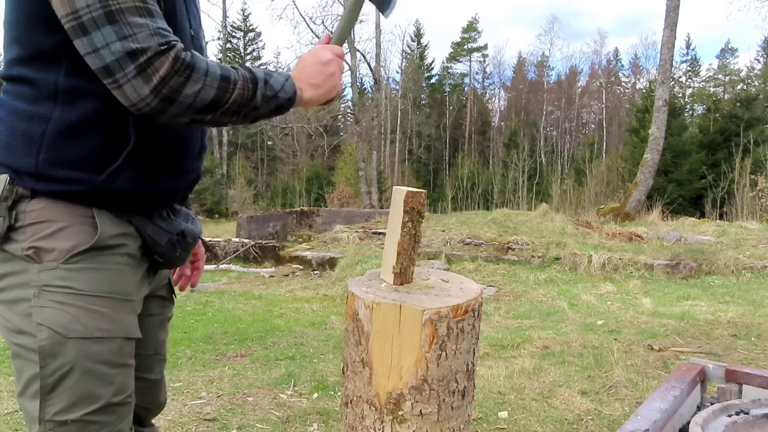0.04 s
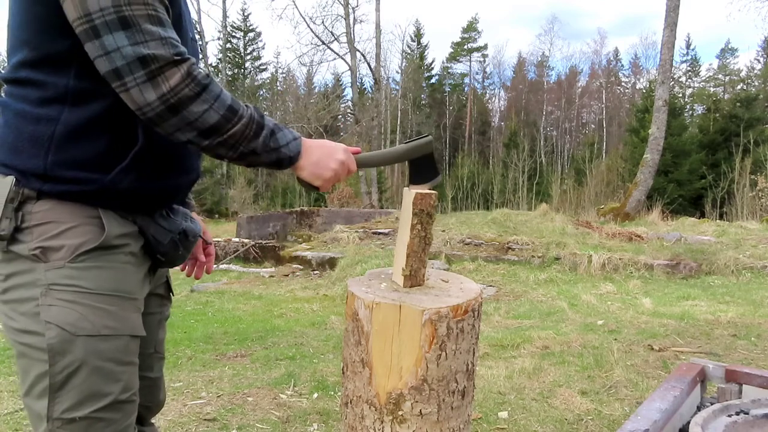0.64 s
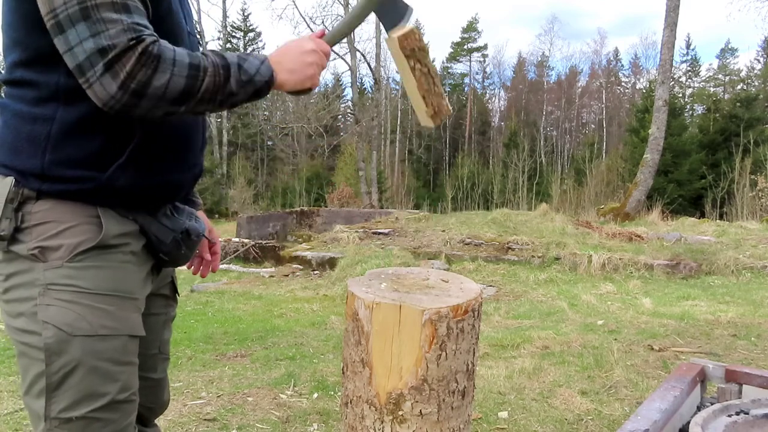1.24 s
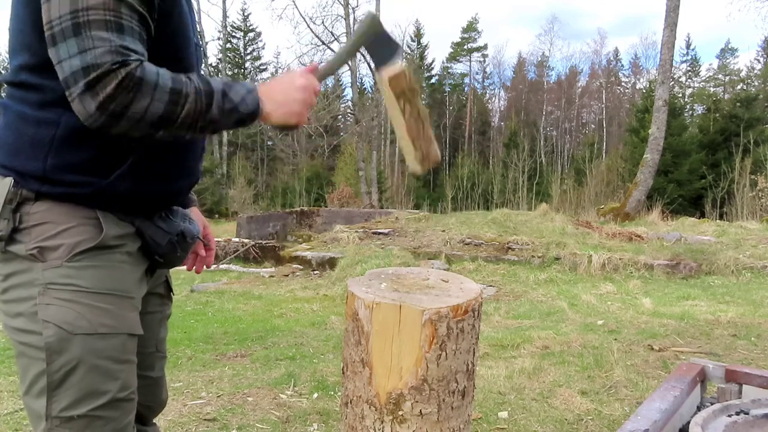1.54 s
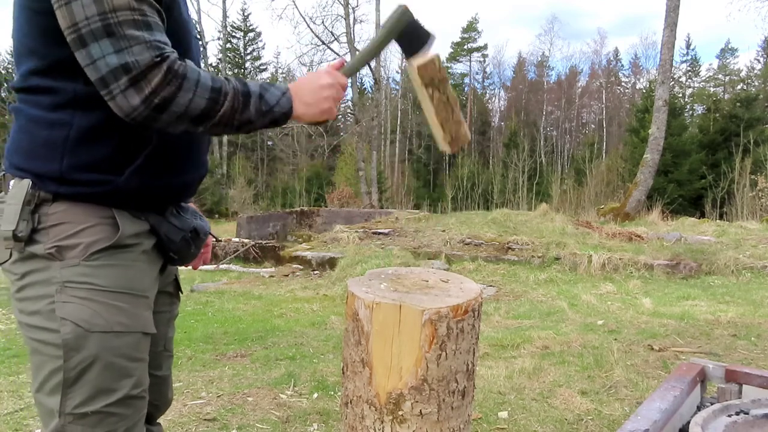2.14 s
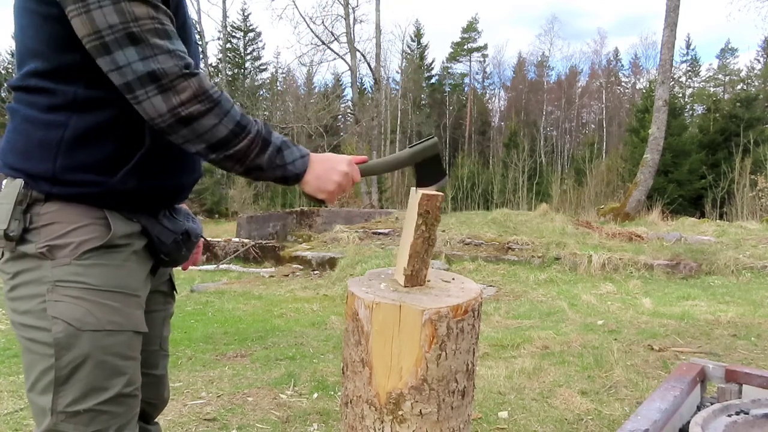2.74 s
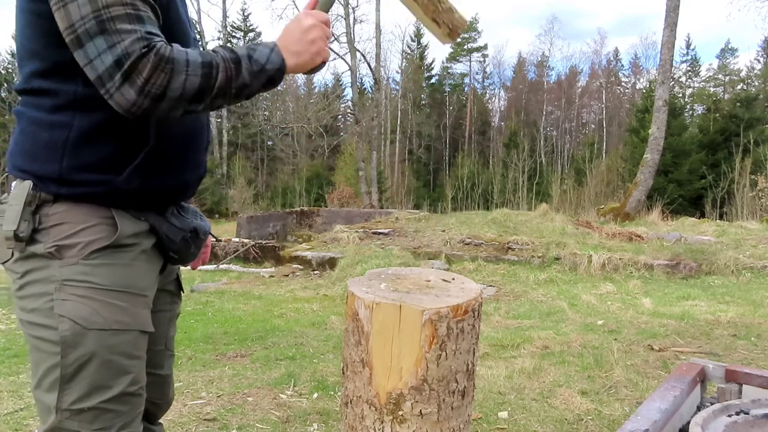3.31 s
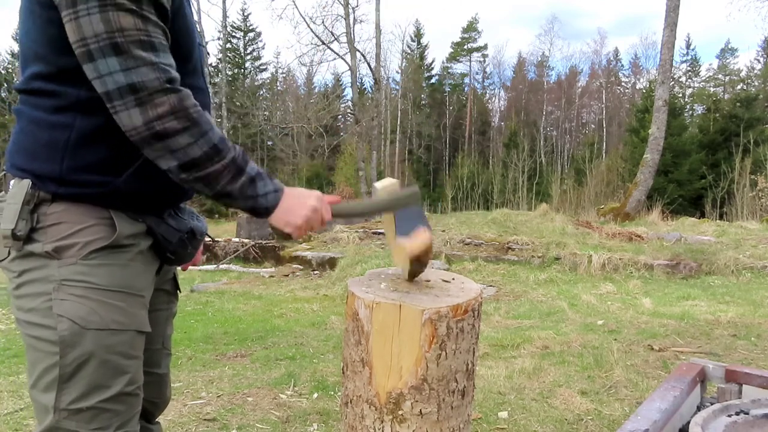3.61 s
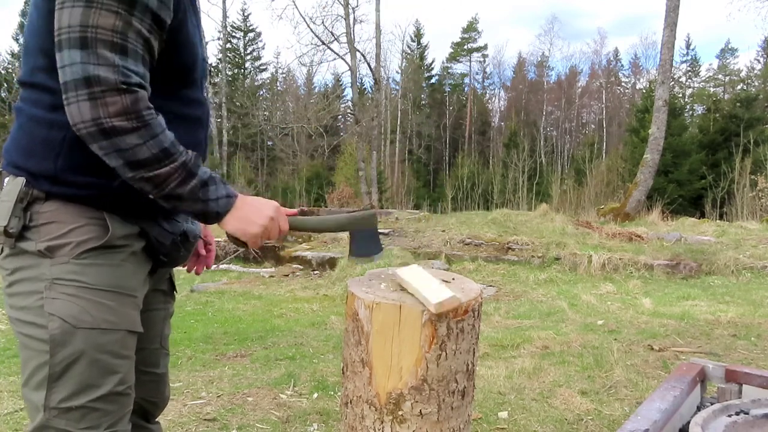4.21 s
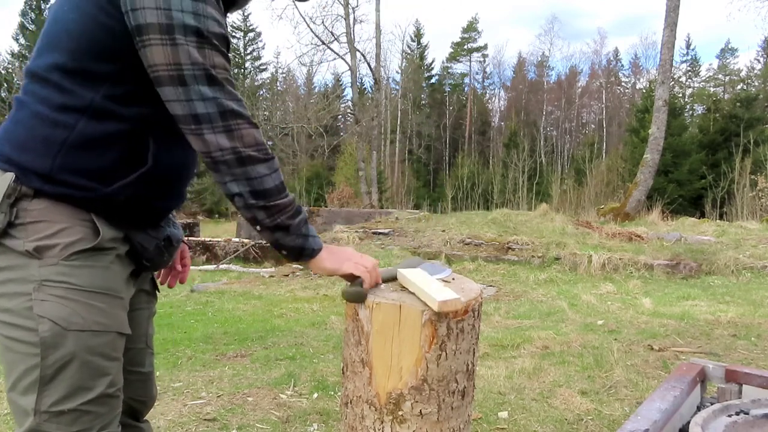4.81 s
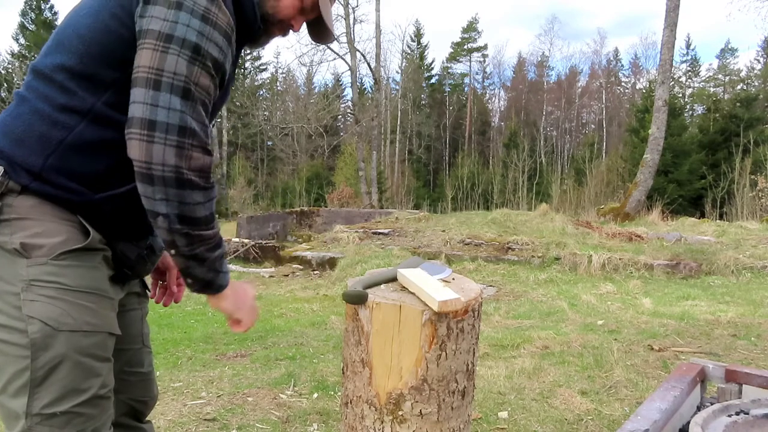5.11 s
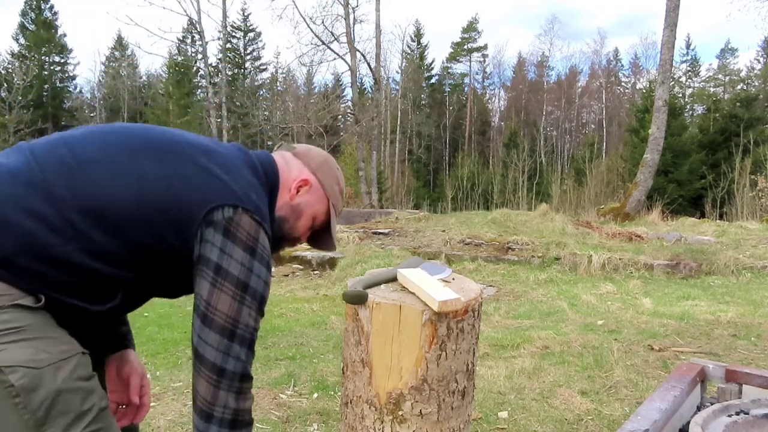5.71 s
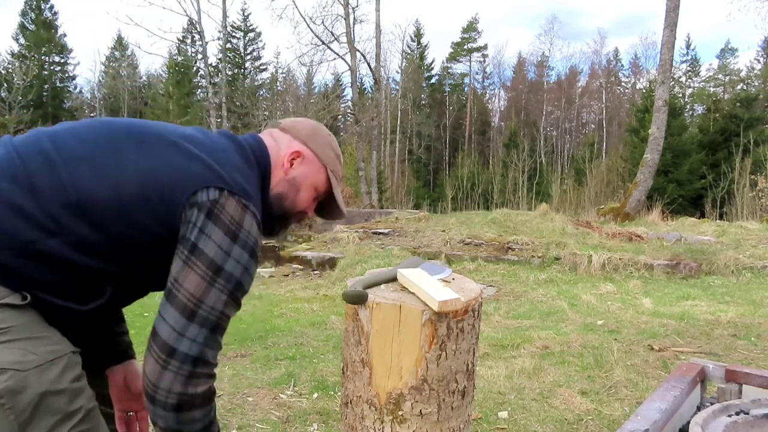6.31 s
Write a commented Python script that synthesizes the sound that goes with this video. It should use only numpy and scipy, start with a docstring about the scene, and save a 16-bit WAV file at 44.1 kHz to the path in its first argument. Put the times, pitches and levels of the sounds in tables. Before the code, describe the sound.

Close by, a hatchet bites into a stick on a chopping block, and both are slammed down three more times until the wood splits. Each sharp chop echoes faintly from distant trees. The halves clatter, the blade scrapes free, and one piece thuds onto grass. Lighter knocks follow as the hatchet is laid down, then clothes rustle and twigs snap softly. The stereo microphone catches low bumps of air.

```python
"""Splitting firewood at the forest edge

Close to the microphone a hatchet bites into a stick on a chopping block; both are slammed down until the
wood splits. The halves clatter, one drops on the turf, the blade is worked free and laid down, and the
chopper stoops, clothes rustling, twigs snapping underfoot. Farther off, the trees throw each chop back.
The near stereo microphone overloads and its stand hums with the jolt."""
import sys
import numpy as np
from scipy import signal
from scipy.fft import rfft, irfft
from scipy.io import wavfile

SR = 44100
rng = np.random.default_rng(int(sys.argv[2]) if len(sys.argv) > 2 else 0)


def wav_out(sig):
    """Save sig, one row per channel (or a flat mono array), as 16-bit PCM at SR to the path in sys.argv[1]."""
    wavfile.write(sys.argv[1], SR, np.round(np.clip(np.atleast_2d(sig).T, -1, 1) * 32767).astype(np.int16))


N = 288842
AGE = np.arange(SR // 2) / SR  # time since a blow, s
FREQS = np.fft.rfftfreq(N, 1 / SR)


# Hard blows, close by: t/s, block level/dB, block pitch factor, stick level/dB, stick pitch factor,
# bite f/Hz, bite level/dB, snap f/Hz, snap level/dB, crack level/dB, crack cutoff/Hz,
# echo band low/Hz, high/Hz, relative echo level/dB
HARD_BLOWS = [(0.3283, 0.993, 1.01, -9, 1.02, 1550, 14, 4630, -8.5, -3, 11700, 950, 1992, 0.5),
              (1.6731, 3.96, 1.053, -10.5, 0.99, 1634, 7, 4560, -3, -7.5, 11940, 950, 1979, -8),
              (2.6943, 3.96, 1.13, -10.5, 1.02, 1303, 7.5, 4330, -2, -2, 15600, 950, 2366, 2),
              (3.6628, 6, .92, -7.5, 0.96, 1980, 4, 2936, 0, -2, 7430, 2220, 3170, -2)]

def chops():
    """The hatchet's blows at the microphone, and the pulse each one sends towards the trees."""
    near, outward = np.zeros(N), np.zeros(N)
    click = signal.unit_impulse(len(AGE))
    wide_band = amp(-14) * unit(bandpass(click, 450, 3575))
    for s, *strike, low_hz, high_hz, echo_db in HARD_BLOWS:
        chop = blow(*strike, bite_t60=0.0094, snap_t60=0.01, crack_t60=0.0079, seat_s=0.00071, hold=1.54)
        add(near, s, chop)
        own_band = unit(bandpass(click, low_hz, high_hz))
        add(outward, s, amp(echo_db - 30.5) * (own_band + wide_band))
    return near, outward


# Modes of the stick and of the block under it: base f/Hz, relative level/dB, base t60/s
STICK_MODES = [(640, -19.5, .045), (944, -4, 0.076), (971, -9.5, 0.041), (1370.2, -15.5, 0.038),
               (1591.4, -13, 0.045), (1977.7, -10, 0.033), (2620.5, -22, 0.0247), (3160, -24.5, 0.029),
               (4120.3, -24.5, .02)]
BLOCK_MODES = [(205.4, -13.5, 0.03), (284.22, -11, 0.012), (481, -5, 0.023994), (785.4, 1.5, 0.012),
               (1121, -9.5, 0.016)]
# Spectrum of snapping fibres: f/Hz, relative level/dB
FIBRE_SPECTRUM = [(100, -23), (800, -2.5), (2200, 10.5), (4400, -0.5), (7500, -2), (12000, -6.5),
                  (16000, -14.5)]

def blow(block_db, block_pitch, stick_db, stick_pitch, bite_hz, bite_db, snap_hz, snap_db, crack_db,
         cutoff_hz, bite_t60, snap_t60, crack_t60, seat_s, tilt_db=0, ring=1, hold=1):
    """Contact gives two short tones and a crack; the stick rings, and the block answers as it seats."""
    pivot_hz = STICK_MODES[1][0]
    stick = sum(amp(db + tilt_db * np.log2(hz / pivot_hz)) * mode(hz * stick_pitch, t60 * ring, 0.0004)
                for hz, db, t60 in STICK_MODES)
    block = sum((-1) ** k * amp(db) * mode(hz * block_pitch, t60, rise_s=seat_s)
                for k, (hz, db, t60) in enumerate(BLOCK_MODES))
    bite = amp(bite_db) * mode(bite_hz, bite_t60, rise_s=0.00049)
    snap = amp(snap_db) * mode(snap_hz, snap_t60, rise_s=0.00055)
    # with hold above 1 the crack lasts while the blade goes in, then stops short
    envelope = amp(-60 * (AGE / crack_t60) ** hold) * onset(0.00027)
    fibres = noise(FIBRE_SPECTRUM, len(AGE)) * envelope
    crack = butter(fibres, "low", cutoff_hz, order=5)
    return amp(block_db) * block + amp(stick_db) * stick + bite + snap + amp(crack_db) * crack


# Light blows at the block: t/s, block level/dB, stick level/dB, stick pitch factor,
# stick tilt/(dB per octave), ring length factor, bite f/Hz, bite level/dB, crack level/dB
LIGHT_BLOWS = [(3.6798, -47, -31, 1.0, 4, 1, 1960, -16, -41.5),
               (3.7269, -14, -47, 1.2, 9, 1, 1902, -17, -31),
               (3.7315, -16.5, -9.5, 0.96, -4.5, 1, 1900, -43, -33),
               (3.8916, -19.5, -19, 1.0, -2, 0.61, 2200, -22.5, -37),
               (4.697, -27, -33.5, 1.03, -1.5, .6, 1520, -43, -39.5),
               (4.7580, -13, -13, 0.9907, -0.5, 0.79, 1610, -18, -23),
               (4.8033, -19.5, -24, 1.02, -6, 1, 1405, -37, -34),
               (4.9018, -13, -11, 0.9921, 7.5, 0.67, 3043, -18, -20),
               (4.9045, -32, -14.5, 0.9916, -1.5, 1, 1377, -12, -34),
               (4.931, -29, -32, 1.02, -3.5, 1, 2770, -44, -48)]

def knocks():
    """Halves and hatchet knock on the block: it rings a little higher, and the end grain clacks."""
    out = np.zeros(N)
    block_pitch, clack_hz = 1.12, 1097
    for s, block_db, stick_db, stick_pitch, tilt_db, ring, bite_hz, bite_db, crack_db in LIGHT_BLOWS:
        knock = blow(block_db, block_pitch, stick_db, stick_pitch, bite_hz, bite_db,
                     snap_hz=clack_hz, snap_db=block_db + 0.5, crack_db=crack_db, cutoff_hz=4200,
                     bite_t60=0.019, snap_t60=0.01, crack_t60=0.016, seat_s=0.0005,
                     tilt_db=tilt_db, ring=ring)
        add(out, s, knock)
    return out


# A split half lands end first, then flat, and settles: t/s, level/dB, pitch factor, ring length factor
LANDINGS = [(4.2382, 2, 1.14, 0.51), (4.2522, -1.5, 0.973, 0.88), (4.308, -30.5, 1.14, 1.6),
            (4.435, -32.5, 1.075, 1.44)]
# Modes of the thud on turf: base f/Hz, relative level/dB, base t60/s
TURF_MODES = [(605, -5, 0.015), (316, -4, 0.021), (231.91, -11, 0.055), (144, -3.5, 0.042)]

def thuds():
    """Wood drops on the turf, and the grass softens the landing."""
    out = np.zeros(N)
    for s, db, pitch, ring in LANDINGS:
        thud = sum(amp(mode_db) * push(hz * pitch, t60 * ring) for hz, mode_db, t60 in TURF_MODES)
        add(out, s, amp(db) * butter(thud, "low", 600, order=4))
    return out


# A splinter, then twigs underfoot: t/s, thump level/dB, ring f/Hz, ring level/dB, crack level/dB
BREAKS = [(3.8187, -30, 2010, -22, -17), (5.464, -26.5, 1190, -23, -43.5), (5.53, -30.5, 1262, -22, -46),
          (5.9037, -24, 1133, -36.5, -47), (6.033, -37.5, 1112, -37.5, -50)]

def snaps():
    """Thin wood breaks: a crack, a short ring with one overtone, and a thump below."""
    out = np.zeros(N)
    for s, thump_db, hz, ring_db, crack_db in BREAKS:
        snap = blow(block_db=thump_db, block_pitch=0.694, stick_db=thump_db - 17, stick_pitch=0.94,
                    bite_hz=hz, bite_db=ring_db, snap_hz=1.37 * hz, snap_db=ring_db + 1,
                    crack_db=crack_db, cutoff_hz=5900,
                    bite_t60=0.02, snap_t60=0.0078, crack_t60=0.029, seat_s=0.0007)
        add(out, s, snap)
    return out


# Faint echoes trailing the chops: t/s, level/dB, band low/Hz, high/Hz, t60/s
CHOP_AFTERSOUNDS = [(1.680, -53.5, 3950, 5300, 0.37), (2.703, -41, 1000, 2680, 0.18),
                    (3.672, -45.5, 2500, 3418, 0.54)]

def aftersounds():
    """A grainy band of echo dies away after a chop."""
    out = np.zeros(N)
    for s, db, low_hz, high_hz, t60 in CHOP_AFTERSOUNDS:
        band = unit(bandpass(grains(len(AGE)), low_hz, high_hz))
        add(out, s, amp(db) * band * decay(t60) * onset(0.0027))
    return out


# Small bright ticks: t/s, level/dB
BRIGHT_TICKS = [(0.882, -53), (1.751, -47.5), (1.955, -50), (2.166, -49), (2.7854, -44.5), (2.909, -50.5),
                (2.9647, -50), (3.729, -38), (3.754, -41), (3.787, -49), (3.858, -42), (4.088, -41),
                (4.2244, -41), (4.2372, -29), (4.253, -39), (4.4282, -45), (4.698, -39), (4.758, -43),
                (5.5028, -39.5)]
# Their spectrum: f/Hz, relative level/dB
TICK_SPECTRUM = [(300, -8), (1500, 13.5), (3500, -0.5), (9000, -0.5), (16000, -26.5)]

def ticks():
    """Short grainy ticks, alone or as the bright edge of knocks and echoes."""
    out = np.zeros(N)
    for s, db in BRIGHT_TICKS:
        tick = unit(colour(grains(len(AGE)), TICK_SPECTRUM))
        add(out, s, amp(db) * tick * decay(0.034) * onset(0.00033))
    return out


# Slips of the blade: peak t/s, relative level/dB, 60 dB rise and fall/s (sign ignored)
BLADE_SLIPS = [(3.728, -44, 0.25), (3.823, -40, -0.07), (3.85, -58, 0.4), (4.085, -44.5, 0.08),
               (4.234, -44.5, 0.12), (4.345, -54, 0.36), (4.52, -55.5, 0.25)]
# Spectrum of steel scraping in the cleft: f/Hz, relative level/dB
SCRAPE_SPECTRUM = [(1000, -18), (2500, 1), (5000, 1), (9000, -2), (14000, -5.5), (16000, -5.5)]

def prying(grains_per_s=5000):
    """The blade slips in the cleft with a fine, clumped crackle."""
    catches = grains(N) * (rng.random(N) < grains_per_s / SR)
    pressure = sum(swell(s, db, length, length) for s, db, length in BLADE_SLIPS)
    scrape = colour(catches, SCRAPE_SPECTRUM) * flicker(depth_db=3, rate_hz=54)
    return amp(-4.5) * pressure * unit(scrape)


# Jolts to the microphone stand: t/s, level/dB, f/Hz, rebound delay/s, rebound level/dB, t60/s
STAND_JOLTS = [(.331, -29.5, 82.43, 0.067, -28.5, 0.42), (1.675, -25.5, 77.6, 0.0446, -18.5, 0.217),
               (2.697, -27.5, 78.8, 0.091, -29.5, 0.34), (3.664, -27, 81.9, .101, -30, 0.37),
               (4.256, -19.5, 73, 0.08664, -52, 0.3)]

def stand_hum():
    """Each heavy blow sets the stand humming, and again as it rocks back."""
    out = np.zeros(N)
    for s, db, hz, rebound_s, rebound_db, t60 in STAND_JOLTS:
        hum = mode(hz, t60, rise_s=0.008)
        add(out, s, amp(db) * hum)
        add(out, s + rebound_s, amp(rebound_db) * hum)
    return out


# Puffs right at the microphone: t/s, level/dB, f/Hz
AIR_PUFFS = [(3.6607, -15, 65.8), (4.556, -28, 38), (4.684, -25, 36), (4.714, -20, 42.13),
             (4.825, -20.5, 117), (4.921, -20, 55.4), (5.134, -24.5, 44)]

def puffs():
    """Single pushes of air strike the microphone as low bumps."""
    out = np.zeros(N)
    for s, db, hz in AIR_PUFFS:
        add(out, s, amp(db) * push(hz, t60=0.068))
    return out


# The chopper stoops nearby: peak t/s, rustle level/dB, swish level/dB, 60 dB rise/s, 60 dB fall/s
BODY_MOVES = [(5.49, -35.5, -58, 0.63, 0.25), (5.68, -54, -66, 0.69, 1), (5.91, -56.5, -62.5, 1.9, 0.684),
              (6.48, -58.5, -63, 1.555, 0.5324)]
# Spectra of coarse cloth and of the sleeve's fine fibres: f/Hz, relative level/dB
CLOTH_SPECTRUM = [(120, -32.5), (200, -4.5), (311, -5), (558, -0.5), (683, -2.5), (806, -5), (1870, -6.5),
                  (3830, -20.5), (9230, -27.5), (16000, -42.5)]
SLEEVE_SPECTRUM = [(2000, -13), (4000, -2), (8000, -1.5), (13000, -5.5), (16000, -9.5)]

def clothes():
    """Each movement rubs a coarse rustle and a fine swish out of the cloth."""
    rustle = sum(swell(s, db, rise, fall) for s, db, _, rise, fall in BODY_MOVES)
    swish = sum(swell(s, db, rise, fall) for s, _, db, rise, fall in BODY_MOVES)
    cloth = pair(CLOTH_SPECTRUM) * rustle * flicker(depth_db=2.07, rate_hz=125)
    sleeve = pair(SLEEVE_SPECTRUM) * swish * flicker(depth_db=1.2794, rate_hz=61)
    return cloth + sleeve


# Swirls round the microphone: peak t/s, level/dB, 60 dB rise and fall/s
AIR_SWIRLS = [(4.449, -46.5, 0.7), (4.699, -38.5, 0.6), (4.83, -34.5, 0.31), (4.91, -28.5, 0.37),
              (5.04, -42.5, .3), (5.23, -34, 0.05), (5.45, -39.5, 1.36), (5.92, -42, 0.37),
              (6.13, -50, 1.3)]
# Spectrum of their rumble: f/Hz, relative level/dB
RUMBLE_SPECTRUM = [(8.8, -43.5), (15, -16.5), (59, 2.5), (164, -12.5), (199, -17.5), (231, -17), (261, -29),
                   (400, -25.5), (520, -63), (880, -120)]

def buffeting():
    """Air stirred by the body and the swinging arm buffets the microphone."""
    return pair(RUMBLE_SPECTRUM) * sum(swell(s, db, length, length) for s, db, length in AIR_SWIRLS)


def near_bounces(x):
    """Quick bounces off the ground and the chopper's body roughen each knock."""
    bounces = amp(-12) * delayed(0.0029) + amp(-26) * delayed(0.0075)
    soft = 1 / (1 + (FREQS / 3500) ** 2)  # grass and cloth swallow the treble
    return irfft(rfft(x) * (1 + soft * bounces), N)


# Echoes off nearby walls and trunks: delay/s, level/dB
EARLY_ECHOES = [(0.051, -30), (0.075, -27.5), (.088, -25.5), (.16, -33.5)]
# The far trees return little treble: f/Hz, relative level/dB
TREE_SPECTRUM = [(1000, 2.5), (2000, -6.5), (3200, -3.5), (6000, -13.5)]

def forest(x, tail_db=-29, t60=1.45, edge_delay_s=0.14, returns_per_s=4000):
    """A few rough early echoes, then scattered returns from the forest edge, in stereo."""
    t = np.arange(SR + SR // 2) / SR
    build_up = amp(-5) * np.clip(t / 0.017, 0, 1)
    envelope = np.where(t < edge_delay_s, build_up, amp(-60 * (t - edge_delay_s) / t60))
    returns = rng.standard_normal((3, len(t))) * (rng.random(len(t)) < returns_per_s / SR)
    trunks = colour(returns, TREE_SPECTRUM) * envelope
    response = trunks[0] + 0.45 * trunks[1:]  # one shared part, plus one for each side
    response *= amp(tail_db) / np.linalg.norm(response[0])
    for delay, db in EARLY_ECHOES:
        rough_face = rng.standard_normal(len(AGE)) * decay(0.059)
        for side in response:
            add(side, delay, amp(db) * rough_face / np.linalg.norm(rough_face))
    return signal.fftconvolve(x[None], response, axes=1)[:, :N]


# Spectrum of the open air all round: f/Hz, relative level/dB
AIR_SPECTRUM = [(12, -32.5), (20, -13), (65, -1.5), (104, -4), (142, -1.5), (301, -5.5), (485, -7.5),
                (574, -12), (759, -8.5), (1060, -16), (1400, -16.5), (2080, -19), (9140, -33),
                (13900, -42.5), (16000, -52.5)]

def still_air():
    """A faint, low outdoor hush that wavers slightly."""
    return amp(-48.5) * pair(AIR_SPECTRUM) * flicker(depth_db=0.5, rate_hz=4)


# Likeness of noise at the left and right microphone ports: f/Hz, correlation (below 0 counts as 0)
PORT_LIKENESS = [(60, 0.972), (180, 0.046), (550, -0.26), (1650, 0.15), (4970, 0.47), (15000, -0.37)]

def pair(spectrum):
    """Noise at the two microphone ports, most alike in the deep bass."""
    same = np.clip(read(PORT_LIKENESS, FREQS), 0, 1)
    mid = rfft(noise(spectrum, N)) * np.sqrt((1 + same) / 2)
    side = rfft(noise(spectrum, N)) * np.sqrt((1 - same) / 2)
    return irfft(np.array([mid + side, mid - side]), N)


def ports(x, scatter_db=-6, lag_s=0.0012):
    """Both ports hear the same low end; the housing scatters the treble differently to each."""
    treble = FREQS ** 2 / (FREQS ** 2 + 4000 ** 2)
    side = irfft(rfft(x) * amp(scatter_db) * treble * delayed(lag_s), N)
    return np.array([x + side, x - side])


def mode(hz, t60, rise_s):
    """One dying vibration with a soft start."""
    return np.sin(2 * np.pi * hz * AGE) * decay(t60) * onset(rise_s)


def push(hz, t60):
    """A dull vibration pushes the air as it changes."""
    return np.gradient(mode(hz, t60, rise_s=0.0022)) * SR / (2 * np.pi * hz)


def onset(rise_s):
    """A gain that climbs from 0 towards 1."""
    return 1 - np.exp(-AGE / rise_s)


def decay(t60):
    """A gain that falls 60 dB in t60 seconds."""
    return amp(-60 * AGE / t60)


def swell(s, db, rise_s, fall_s):
    """A gain that peaks at time s, moving 60 dB in the rise and fall times."""
    t = np.arange(N) / SR - s
    return amp(db - 60 * np.maximum(-t / rise_s, t / fall_s))


def flicker(depth_db, rate_hz):
    """A gain that wanders at random by depth_db rms, up to about rate_hz."""
    smoothing = np.exp(-(FREQS / rate_hz) ** 2)
    wander = irfft(rfft(rng.standard_normal(N)) * smoothing, N)
    return amp(depth_db * unit(wander))


def grains(size):
    """Spiky, uneven noise."""
    return rng.standard_normal(size) * rng.exponential(1, size)


def noise(spectrum, size):
    """Coloured noise of rms 1."""
    return unit(colour(rng.standard_normal(size), spectrum))


def colour(x, spectrum):
    """Filters by a table of f/Hz, level/dB."""
    size = x.shape[-1]
    return irfft(rfft(x) * amp(read(spectrum, np.fft.rfftfreq(size, 1 / SR))), size)


def read(points, hz):
    """Reads a table on a log-frequency axis."""
    f, value = np.transpose(points)
    return np.interp(np.log(hz + 1), np.log(f + 1), value)


def butter(x, kind, hz, order):
    """Filters with a flat passband."""
    return signal.sosfilt(signal.butter(order, hz, btype=kind, fs=SR, output="sos"), x)


def bandpass(x, low_hz, high_hz):
    """Keeps one band."""
    return butter(x, "band", [low_hz, high_hz], order=3)


def delayed(s):
    """Frequency response of a delay of s seconds."""
    return np.exp(-2j * np.pi * FREQS * s)


def amp(db):
    """Decibels to gain."""
    return 10 ** (np.asarray(db) / 20)


def unit(x):
    """Scales to rms 1."""
    return x / np.sqrt(np.mean(x ** 2) + 1e-20)


def add(mix, s, sound):
    """Mixes a sound in at time s."""
    part = mix[round(s * SR):][:len(sound)]
    part += sound[:len(part)]


def scene():
    """Blows and small sounds up close, echoes from the trees, open air all round."""
    near, outward = chops()
    light = knocks() + snaps()
    chopping = near_bounces(near + light) + aftersounds() + ticks() + prying() + thuds()
    foreground = ports(chopping + puffs() + stand_hum())
    echoes = forest(outward + amp(-10.5) * light)
    return foreground + echoes + still_air() + clothes() + buffeting()


def record(dry, low_cut_hz=27, band_limit_hz=16200):
    """The microphone sheds the deepest bass, flattens peaks at full scale and cuts the top treble."""
    x = butter(dry, "high", low_cut_hz, order=2)
    clipped = x / (1 + x ** 8) ** (1 / 8)
    band_limit = signal.firwin(511, band_limit_hz, window=("kaiser", 9), fs=SR)
    return signal.oaconvolve(clipped, band_limit[None], "same")


dry = scene()
out = record(dry)
wav_out(out)
```